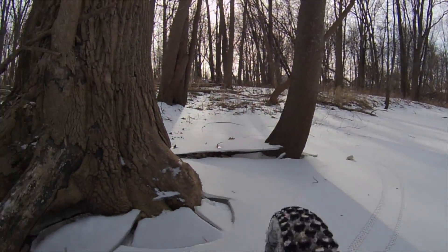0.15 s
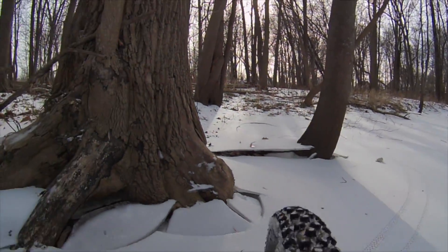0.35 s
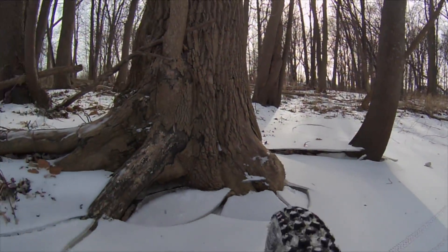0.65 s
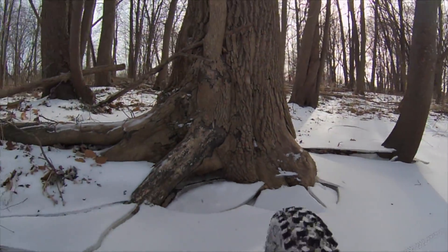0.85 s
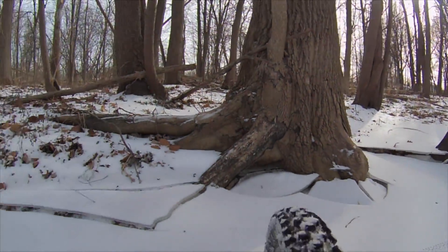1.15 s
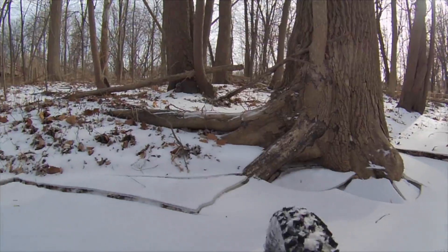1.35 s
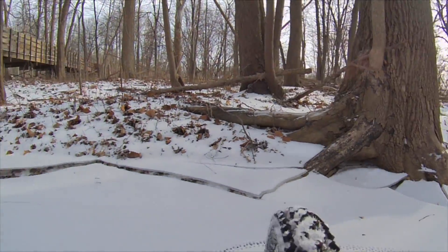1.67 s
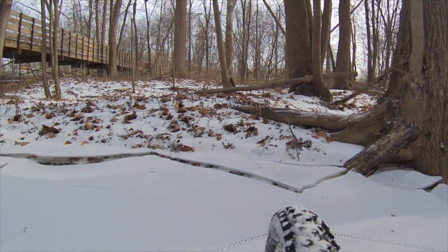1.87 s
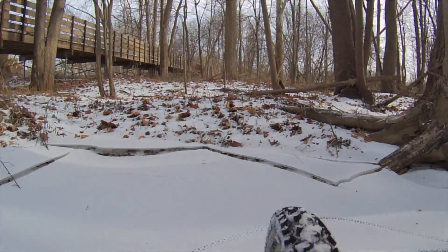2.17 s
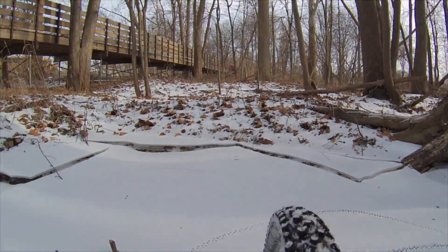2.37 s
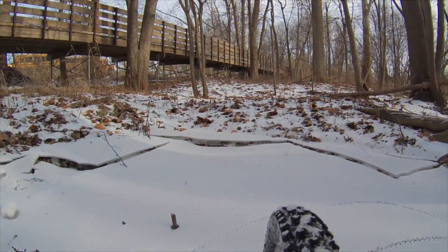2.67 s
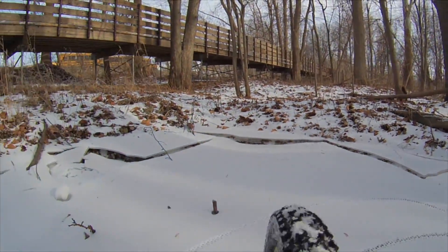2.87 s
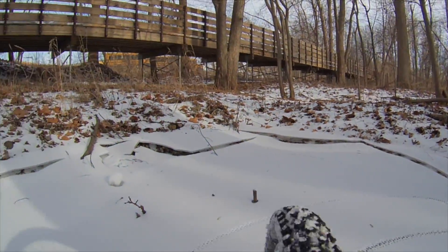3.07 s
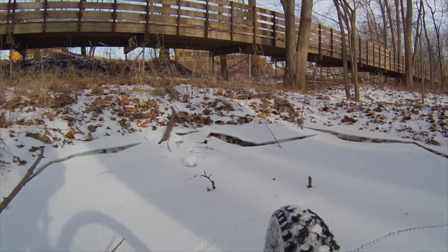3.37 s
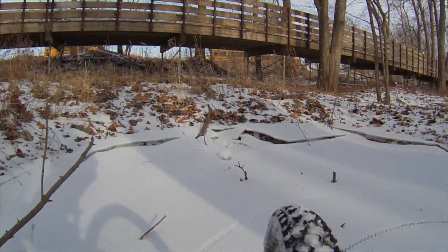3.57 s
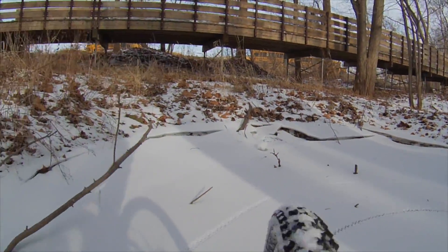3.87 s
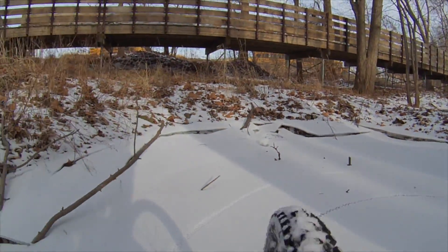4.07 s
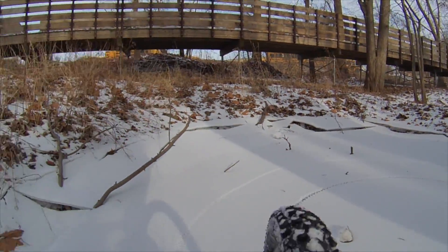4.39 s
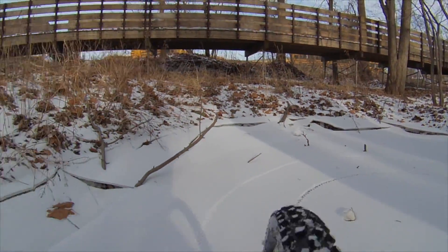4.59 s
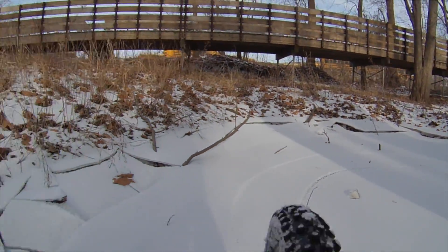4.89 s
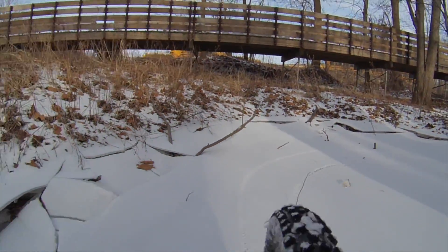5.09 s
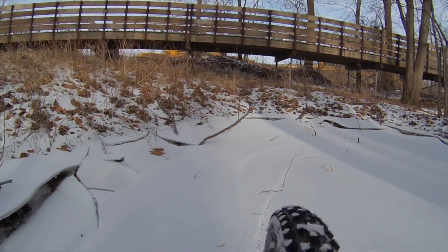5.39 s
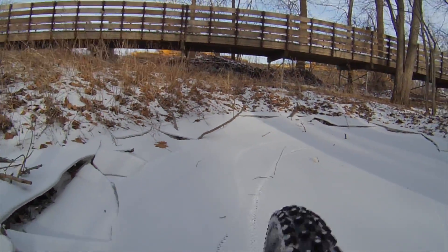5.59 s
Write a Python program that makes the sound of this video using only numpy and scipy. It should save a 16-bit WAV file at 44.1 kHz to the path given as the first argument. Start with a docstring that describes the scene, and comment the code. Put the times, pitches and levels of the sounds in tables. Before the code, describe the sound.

Close, dry outdoor sound from a bike frame: deep wavering tread hum, light wind rumble and fine snow crunch. A few bright snaps open it, followed by small dull ticks. Past the middle, ice plates splinter in quick clusters of snaps, knocks and low frame thumps. Then come isolated cracks over louder crunching snow and gusty low wind.

```python
"""Bike over cracking ice

A fat-tyred bike rolls slowly over snow-covered ice, heard by a small microphone on the frame.
Wind buffets the microphone port as shaped noise; the tread hums as a sine with ringing frame tones.
Snow crunches and hisses in dense clicks; jolts ring the frame as short, dying tones.
Ice crackles in bursts of noise and cracks with a snap, a knock and a thud; dull ticks come from the bike.
"""
import sys
import numpy as np
from scipy import signal
from scipy.io import wavfile

SR = 44100
rng = np.random.default_rng(int(sys.argv[2]) if len(sys.argv) > 2 else 0)


def digitize_waveform(pressure):
    """Quantize a signal to 16-bit integers and store it at the path in sys.argv[1].

    Rows of a 2-D input are taken as channels; values are limited to [-1, 1].
    """
    field = np.atleast_2d(pressure).T
    bounded = np.clip(field, -1, 1)
    quanta = np.round(bounded * 32767).astype(np.int16)
    wavfile.write(sys.argv[1], SR, quanta)


N = 253134


def from_db(db):
    """Turn decibels into a gain."""
    return 10 ** (np.asarray(db) / 20)


def rms_one(x):
    """Scale a sound so that its average strength (rms) is 1."""
    return x / np.sqrt(np.mean(x ** 2) + 1e-20)


def peak_one(x):
    """Scale a sound so that its highest peak is 1."""
    return x / np.abs(x).max()


def in_time(rows):
    """Draw straight lines between the rows of a curve, giving each column a value at every sample."""
    times, *columns = np.transpose(rows)
    return [np.interp(np.arange(N) / SR, times, column) for column in columns]


def drift(rate_hz):
    """Wander slowly by chance: noise smoothed twice by a one-pole low-pass, with spread 1."""
    step = 40   # samples between slow values
    warm_up = 2000   # slow values dropped while the filter settles
    pole = np.exp(-2 * np.pi * rate_hz * step / SR)
    noise = rng.standard_normal(N // step + 2 + warm_up)
    slow = signal.lfilter([1], [1, -2 * pole, pole * pole], noise)[warm_up:]
    return np.interp(np.arange(N) / step, np.arange(len(slow)), rms_one(slow))


def resonance(x, hz, width_hz):
    """Favour one pitch, as a body that rings does: two poles, gain 1 on top."""
    pole = np.exp(-np.pi * width_hz / SR)
    feed = np.array([1, 0, -1]) * (1 - pole * pole) / 2
    return signal.lfilter(feed, [1, -2 * pole * np.cos(2 * np.pi * hz / SR), pole * pole], x)


def resonance_twice(x, hz, width_hz):
    """Pass through the same resonance twice, for steeper sides."""
    return resonance(resonance(x, hz, width_hz), hz, width_hz)


def band(x, low_hz, high_hz):
    """Keep only the pitches between two limits (Butterworth band-pass)."""
    return signal.sosfilt(signal.butter(2, [low_hz, high_hz], "band", fs=SR, output="sos"), x)


def grains(per_s, spread_db):
    """Scatter clicks of uneven size and either sign at random; rms 1."""
    size_db = spread_db * np.minimum(rng.exponential(1, N), 5)
    clicks = from_db(size_db) * rng.choice([-1, 1], N)
    happens = rng.random(N) < per_s / SR
    return rms_one(clicks * happens + 1e-9)


def coloured(x, spectrum, patchy_db, patch_rate_hz):
    """Split into third-octave bands at the levels of a spectrum, flickering partly alone; rms 1."""
    hz, db = np.transpose(spectrum)
    edges = np.geomspace(hz[0], hz[-1], int(3 * np.log2(hz[-1] / hz[0])) + 2)
    together = drift(patch_rate_hz)
    out = 0
    for k, (low, high) in enumerate(zip(edges, edges[1:])):
        level_db = np.interp(np.log(low * high) / 2, np.log(hz), db)
        flicker_db = patchy_db * (0.96 * together + 0.65 * drift(patch_rate_hz))
        sign = (-1) ** k   # signs alternate so that neighbours add up
        out = out + sign * from_db(level_db + flicker_db) * band(x, low, high)
    return rms_one(out)


# strength of the wind's buffets: (time [s], level [dB])
WIND_LEVEL = [(0.0, -57), (0.03, -43.5), (0.94, -45), (0.99, -34.5), (1.17, -45.5), (2.41, -42.5),
              (3.02, -38), (3.05, -42.5), (3.39, -36), (3.42, -49), (3.49, -40), (3.58, -51), (3.77, -30),
              (3.85, -27), (3.97, -34.5), (4.4, -36), (4.43, -27.5), (4.78, -27), (4.83, -41.5),
              (4.89, -29.5), (4.99, -35), (5.42, -29.5), (5.45, -37.5), (5.74, -32)]
# colour of the deep buffets: (pitch [Hz], level [dB per Hz])
BUFFET_COLOUR = [(9, 4.5), (17, 2.5), (28, -5.5), (45, -4), (70, -14.5), (100, -14)]
# colour of the lighter flutter: (pitch [Hz], level [dB per Hz])
FLUTTER_COLOUR = [(60, -2.5), (100, 5.5), (140, 3), (200, -7.5), (320, -24)]
FLUTTER_DB, FLUTTER_FOLLOWS = -52.5, 0.93   # level at mean wind; share of the buffets' swing in dB


def wind():
    """Lumpy air pressure pushes on the port: deep buffets with a lighter flutter above."""
    buffet_db, = in_time(WIND_LEVEL)
    flutter_db = FLUTTER_DB + FLUTTER_FOLLOWS * (buffet_db - buffet_db.mean())
    buffet = coloured(rng.standard_normal(N), BUFFET_COLOUR, patchy_db=0.0, patch_rate_hz=22.0)
    flutter = coloured(rng.standard_normal(N), FLUTTER_COLOUR, patchy_db=2.5, patch_rate_hz=27)
    return from_db(buffet_db) * buffet + from_db(flutter_db) * flutter


# strength of the tread hum: (time [s], level [dB])
TREAD_LEVEL = [(0, -49), (.5, -39), (.97, -45), (1.5, -40), (1.9, -49), (2.25, -41.5), (2.9, -48),
               (3.5, -51), (4.3, -69), (5.74, -52.5)]
HUM_START_HZ, HUM_RISE_HZ_PER_S = 68, 3.7   # the pitch climbs evenly with speed


def tread_hum():
    """Tyre knobs meet the ground ever faster as the bike gathers speed; pitch and level waver."""
    level_db, = in_time(TREAD_LEVEL)
    level_db = level_db + 0.63 * drift(8.5)
    hz = HUM_START_HZ + HUM_RISE_HZ_PER_S * np.arange(N) / SR + 0.35 * drift(2.05)
    tone = np.sqrt(2) * np.sin(2 * np.pi * np.cumsum(hz) / SR)   # rms 1
    return from_db(level_db) * tone


# frame tones kept ringing by the ride: (pitch [Hz], width [Hz], level [dB])
FRAME_TONES = [(42.1, 0.46, -48), (128.8, 0.85, -59), (186.8, 2.6, -64)]


def frame_hum():
    """The ride shakes the frame like noise, and its narrow resonances ring on and waver."""
    shaking = rng.standard_normal(N + SR)   # the first second lets the ringing build up
    out = 0
    for hz, width_hz, level_db in FRAME_TONES:
        ringing = resonance(shaking, hz, width_hz)[SR:]
        out = out + from_db(level_db) * rms_one(ringing)
    return out


# snow under the tyre: (time [s], crunch level [dB], hiss level [dB])
SNOW_LEVELS = [(0, -57.5, -60), (.5, -58.5, -61.5), (1.7, -55.5, -60), (2.1, -56.5, -60.5),
               (3.4, -53, -55.5), (4.05, -49.5, -48.5), (4.3, -51, -53.5), (4.7, -50.5, -54),
               (5.05, -49, -54), (5.4, -50.5, -55.5), (5.74, -52, -55.5)]
# colour of the crunch before the tyre joins in: (pitch [Hz], level [dB per Hz])
CRUNCH_COLOUR = [(200, 1), (400, 2.5), (650, -3.5), (950, -1), (1400, -4), (2100, -18), (3500, -6),
                 (5000, -17)]
# resonances of the tyre casing: (pitch [Hz], width of each of two passes [Hz], level beside crunch [dB])
TYRE_TONES = [(1756, 620, -3), (2530, 750, -2), (3186, 260, -9.5)]
# colour of the finest crystals: (pitch [Hz], level [dB per Hz])
HISS_COLOUR = [(3000, 2), (4500, 7), (6000, 10), (8500, 6), (10500, 7.5), (13000, 0), (16000, 9.5)]


def snow():
    """Crystals crush in dense grains that also ring the tyre casing; the finest make a hiss."""
    crunch_db, hiss_db = in_time(SNOW_LEVELS)
    crunch = coloured(grains(6000, spread_db=3.0), CRUNCH_COLOUR, patchy_db=2.5, patch_rate_hz=41)
    for hz, width_hz, level_db in TYRE_TONES:
        knobs = grains(2500, spread_db=1.0) * from_db(2.5 * drift(25))
        crunch = crunch + from_db(level_db) * rms_one(resonance_twice(knobs, hz, width_hz))
    hiss = coloured(grains(12000, spread_db=2.5), HISS_COLOUR, patchy_db=1.22, patch_rate_hz=7.4)
    return from_db(crunch_db) * rms_one(crunch) + from_db(hiss_db) * hiss


# the wheel drops through a plate and jolts the frame: (time [s], peak level [dB], pitch [Hz])
JOLT_EVENTS = [(0.206, -39, 220), (1.016, -57, 108), (2.88, -31.5, 107), (3.161, -23.5, 135),
               (3.25, -26.5, 156), (3.605, -26, 107), (3.642, -19.5, 111), (3.686, -30, 162),
               (3.732, -26, 145), (3.881, -32.5, 212), (3.914, -23, 268), (3.967, -25.5, 562),
               (4.177, -20.5, 500), (4.525, -29, 360)]
JOLT_T60_S, JOLT_T60_FALL = 0.079, 0.3   # time to fall 60 dB at 100 Hz; power by which pitch shortens it


def jolts():
    """A soft push, a quarter cycle long, sets a low tone ringing."""
    out, t = np.zeros(N + SR), np.arange(SR // 3) / SR
    for start_s, peak_db, hz in JOLT_EVENTS:
        t60_s = JOLT_T60_S * (hz / 100) ** -JOLT_T60_FALL
        push = np.minimum(4 * hz * t, 1)
        ring = np.sin(2 * np.pi * hz * t) * from_db(-60 * t / t60_s) * push
        at = round(start_s * SR)
        out[at:at + len(t)] += from_db(peak_db) * peak_one(ring)
    return out[:N]


# runs of small ice fractures: (start time [s], hold [s], knock level [dB], snap above knock [dB])
CRACKLE_RUNS = [(3.155, 0.032, -41.5, -24), (3.185, 0.06, -50, -11), (3.245, 0.054, -43, -5),
                (3.59, 0.082, -43, -9), (3.694, 0.11, -40.5, 4.5), (3.833, .1, -44, 7),
                (3.962, 0.0043, -31.5, -7), (4, 0.043, -68, 5), (4.05, 0.099, -55, 3),
                (4.169, 0.013, -38, 2.5), (4.29, 0.013, -49.5, -8), (4.338, 0.051, -55, 2),
                (4.514, 0.012, -44.5, 3), (4.582, 0.055, -54.5, -1)]
FRACTURES_PER_S, FRACTURE_FADE_S = 1400, 0.0033   # the fade is the time to fall to 37 %
RUN_ATTACK_S, RUN_RELEASE_DB_PER_S = 0.0056, 510
RUN_THUD_DB = 5.5   # thud above knock


def crackle():
    """Fractures splinter for a few milliseconds each, with snap, knock and thud at the same moments.
    A run swells, holds and dies away."""
    t = np.arange(N) / SR
    fading = np.exp(-1 / (FRACTURE_FADE_S * SR))
    hits = np.abs(grains(FRACTURES_PER_S, spread_db=6.0))
    bursts = rms_one(signal.lfilter([1], [1, -fading], hits))
    splinters = bursts * rng.standard_normal((3, N))
    snap = rms_one(band(splinters[0], 3400, 13300))
    knock = rms_one(band(splinters[1], 910, 4400))
    thud = rms_one(band(splinters[2], 50, 614))
    snap_gain, low_gain = np.zeros((2, N))
    for start_s, hold_s, level_db, snap_db in CRACKLE_RUNS:
        swell = np.clip((t - start_s) / RUN_ATTACK_S, 0, 1)
        after_s = np.maximum(t - start_s - RUN_ATTACK_S - hold_s, 0)
        shape = swell * from_db(level_db - RUN_RELEASE_DB_PER_S * after_s)
        low_gain = low_gain + shape
        snap_gain = snap_gain + from_db(snap_db) * shape
    return snap_gain * snap + low_gain * (knock + from_db(RUN_THUD_DB) * thud)


KNOCK_WIDTH_HZ = 1140   # of each of two passes
KNOCK_BROAD, KNOCK_RING = 0.45, 0.35   # gain of broad noise; gain of the clear tone beside a noise peak of 1
SNAP_TOP = 0.27   # gain of the snap's extra top


def sharp_breaks(rows):
    """Each break is a splintery snap, a knock at its own pitch and a dull thud beneath."""
    out, t = np.zeros(N + SR), np.arange(SR // 5) / SR
    for start_s, snap_db, knock_db, hz, thud_db, t60_s in rows:
        a, b, c = rng.standard_normal((3, len(t)))
        fall = from_db(-60 * t / t60_s) * np.minimum(t / 0.00039, 1)   # quick rise, then decay
        splinters = a * np.abs(b) ** 0.8 * fall   # uneven, spiky grains
        snap = band(splinters, 3500, 10000)
        snap = snap + SNAP_TOP * band(splinters * fall, 8800, 12800)   # the top dies first
        knock = resonance_twice(b * fall, hz, KNOCK_WIDTH_HZ)
        knock = knock + KNOCK_BROAD * band(a * fall, 900, 3800)
        knock = peak_one(knock) + KNOCK_RING * fall * np.sin(2 * np.pi * hz * t)
        thud = band(c * from_db(-60 * t / (0.4 * t60_s)), 210, 1350)   # the thud dies sooner
        at = round(start_s * SR)
        for part, peak_db in (snap, snap_db), (knock, knock_db), (thud, thud_db):
            out[at:at + len(t)] += from_db(peak_db) * peak_one(part)
    return out[:N]


# dull little ticks from the bike: (time [s], knock peak level [dB])
TICK_EVENTS = [(.3813, -43), (1.3543, -35), (1.5465, -32.5), (1.7062, -33), (1.8734, -35.5), (2.204, -40),
               (2.8169, -30.5)]
TICK_HZ, TICK_T60_S = 1790, 0.0053   # pitch; time to fall 60 dB
TICK_SNAP_DB, TICK_THUD_DB = -9, -15   # beside the knock


def ticks():
    """Parts of the bike tick: very short breaks of one pitch and balance, with the knock on top."""
    rows = []
    for start_s, knock_db in TICK_EVENTS:
        rows.append((start_s, knock_db + TICK_SNAP_DB, knock_db, TICK_HZ, knock_db + TICK_THUD_DB, TICK_T60_S))
    return sharp_breaks(rows)


# single ice cracks: (time [s], snap peak level [dB], knock peak level [dB], knock pitch [Hz],
# thud peak level [dB], time for snap and knock noise to fall 60 dB [s])
CRACK_EVENTS = [(.0071, -24.5, -29.5, 3200, -30.5, 0.022), (.151, -25.5, -36.5, 2440, -58, 0.031),
                (.2159, -57, -55, 1210, -38, 0.06), (.2678, -23.5, -38, 2560, -60, 0.026),
                (.3647, -43, -55, 2580, -58, 0.011), (.7119, -31, -40, 2700, -49, 0.014),
                (1.0146, -37, -37, 2240, -38.5, 0.026), (2.565, -27, -41, 1260, -41, 0.016),
                (2.963, -35, -44, 2690, -57, 0.021), (3.1563, -17, -24, 1740, -42, 0.068),
                (3.2479, -10, -12, 1930, -25, 0.014), (3.2777, -17.5, -24, 1860, -22, 0.011),
                (3.285, -36, -22, 2650, -34, .032), (3.3115, -26.5, -35.5, 2200, -43, 0.046),
                (3.557, -32.5, -37, 2380, -33, 0.085), (3.5944, -19.5, -31, 2360, -29, 0.044),
                (3.6092, -41, -20.5, 2100, -21, .014), (3.634, -18, -12.5, 3610, -38, 0.049),
                (3.6387, -13.5, -23, 3600, -25, 0.033), (3.6461, -16.5, -22, 2740, -40, 0.062),
                (3.6597, -13, -18, 4490, -41, 0.11), (3.674, -15, -43, 4600, -41, 0.1),
                (3.685, -36, -21.5, 3180, -34, .041), (3.7024, -34, -25.5, 3100, -39, 0.015),
                (3.7276, -45, -19.5, 2450, -28, 0.032), (3.7377, -23, -13.5, 2430, -23.5, 0.024),
                (3.7534, -13.5, -31, 3370, -45, 0.0074), (3.778, -17.5, -29, 1190, -33, 0.15),
                (3.7965, -23, -18, 3820, -18, .05), (3.806, -15, -27, 1150, -40, 0.019),
                (3.8165, -19.5, -23, 2600, -45, 0.094), (3.8651, -25, -25.5, 2900, -17, 0.014),
                (3.884, -24, -37, 4470, -35, 0.044), (3.8993, -21, -46, 4340, -49, 0.083),
                (3.9128, -25, -20, 1620, -35, 0.045), (3.93, -26, -33, 2500, -32, 0.13),
                (3.968, -30, -31, 1240, -20, 0.028), (3.9725, -16, -25, 1250, -16, 0.027),
                (4.0712, -23.5, -33.5, 2550, -30.5, .048), (4.1336, -15.5, -24, 2290, -36, 0.014),
                (4.14, -13, -24, 2220, -25, .0095), (4.1612, -20, -32, 3200, -33, 0.016),
                (4.1735, -13, -27, 4060, -22.5, 0.072), (4.1826, -18, -26.5, 2400, -28, 0.038),
                (4.3018, -28.5, -45, 1660, -30, 0.03), (4.3468, -31, -42, 1210, -34, 0.08),
                (4.3622, -31, -36.5, 2330, -40, 0.02), (4.4928, -18, -36, 3660, -23, 0.01),
                (4.5234, -11, -28, 2560, -27, 0.011), (4.5263, -16, -36, 4440, -32, 0.044),
                (4.6337, -35, -39, 2960, -35, 0.042), (4.7846, -36.5, -52, 1970, -50, .031),
                (5.0946, -20, -14, 2405, -31, 0.031), (5.2976, -39, -60, 2455, -42, .023),
                (5.413, -40, -51, 2530, -54, 0.19), (5.678, -37, -54, 1550, -53, .05),
                (5.7024, -29.5, -37, 1960, -45, 0.014)]


def cracks():
    """Ice plates break one by one, each knocking at the pitch of the broken plate."""
    return sharp_breaks(CRACK_EVENTS)


def scene():
    """Add up every source at one microphone, outdoors and close."""
    background = wind() + tread_hum() + frame_hum() + snow()
    ice_and_bike = jolts() + crackle() + ticks() + cracks()
    return (background + ice_and_bike)[None]


PORT_HZ, PORT_WIDTH_HZ, PORT_DB = 8000, 990, 12.5   # resonance of the microphone port
PEAK_LIMIT = 0.31   # height towards which peaks are rounded
CUTOFF_HZ = 13950


def record(dry):
    """The port lifts a band of treble, peaks are rounded, the top is cut."""
    lifted = dry + (from_db(PORT_DB) - 1) * resonance(dry, PORT_HZ, PORT_WIDTH_HZ)
    rounded = PEAK_LIMIT * np.tanh(lifted / PEAK_LIMIT)
    top_cut = signal.ellip(10, 0.2, 80, CUTOFF_HZ, fs=SR, output="sos")   # steep low-pass
    return signal.sosfilt(top_cut, rounded)


dry = scene()
out = record(dry)
digitize_waveform(out)
```